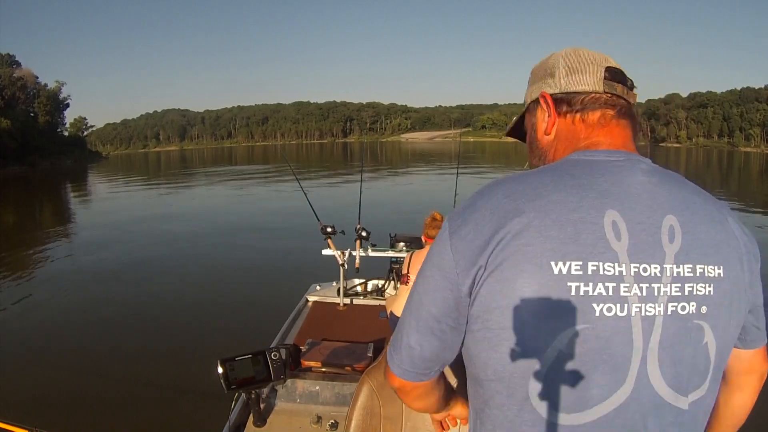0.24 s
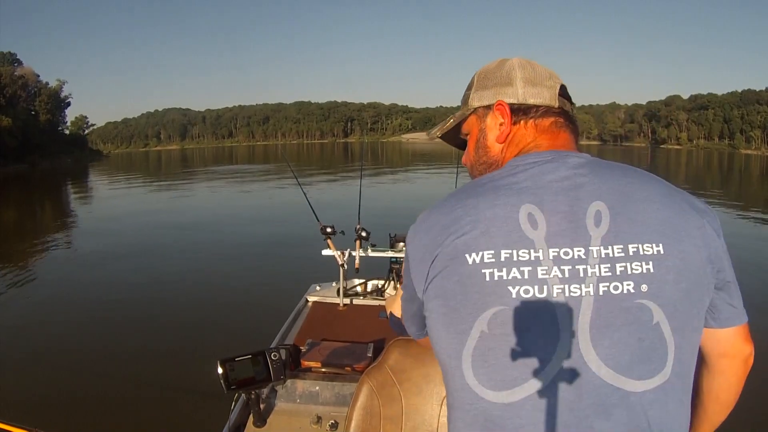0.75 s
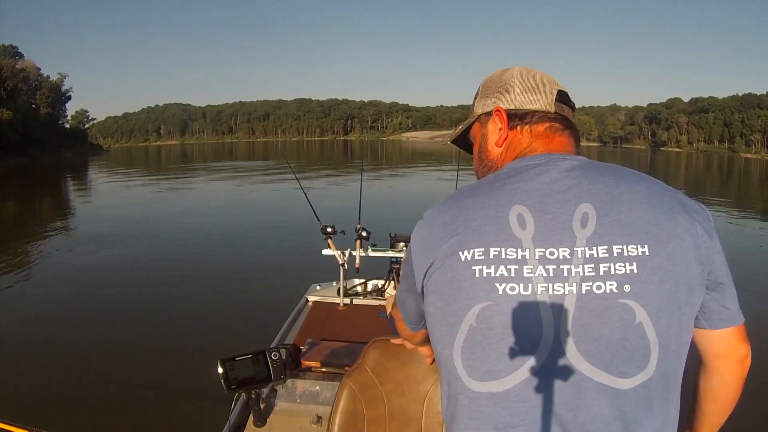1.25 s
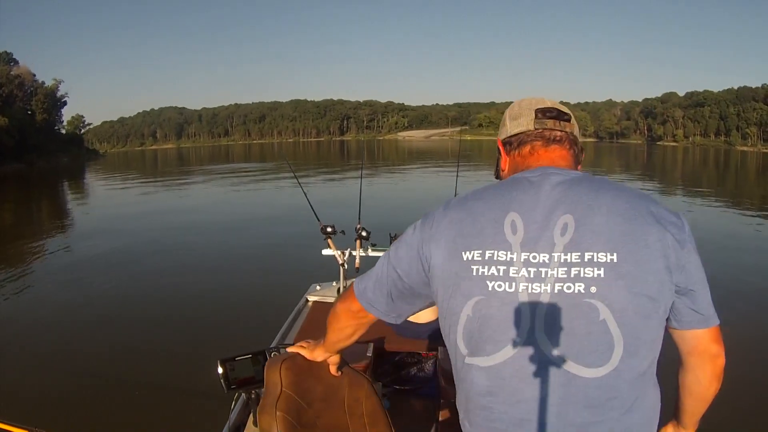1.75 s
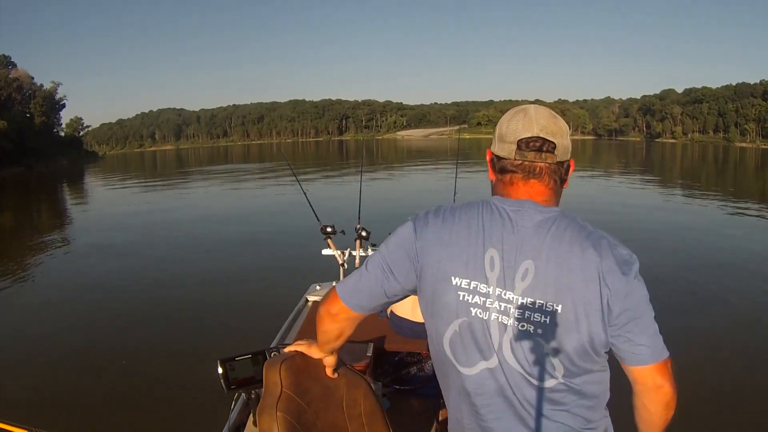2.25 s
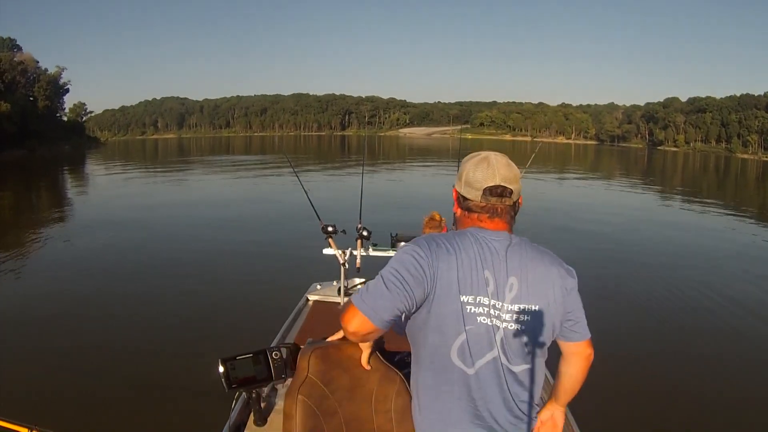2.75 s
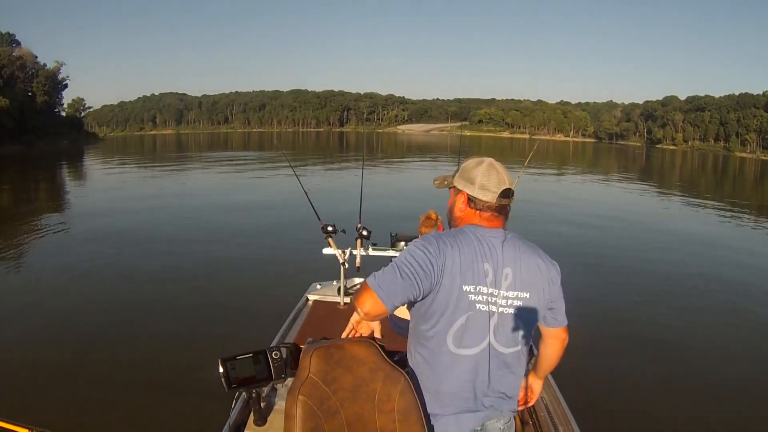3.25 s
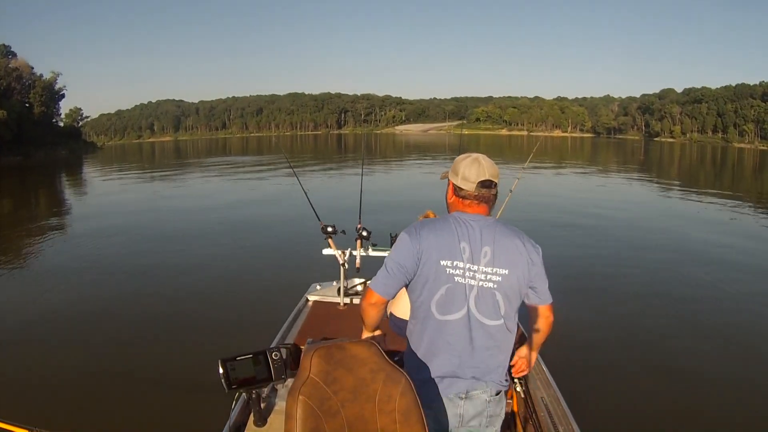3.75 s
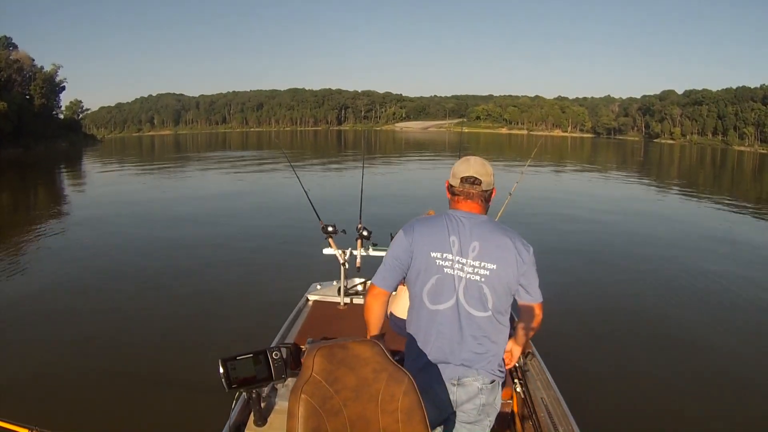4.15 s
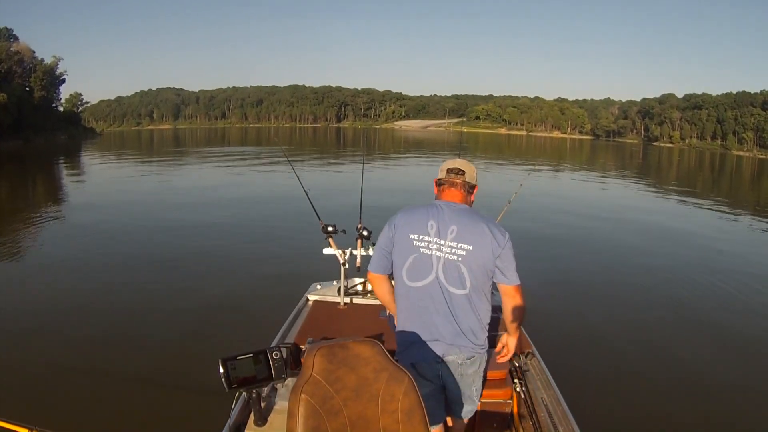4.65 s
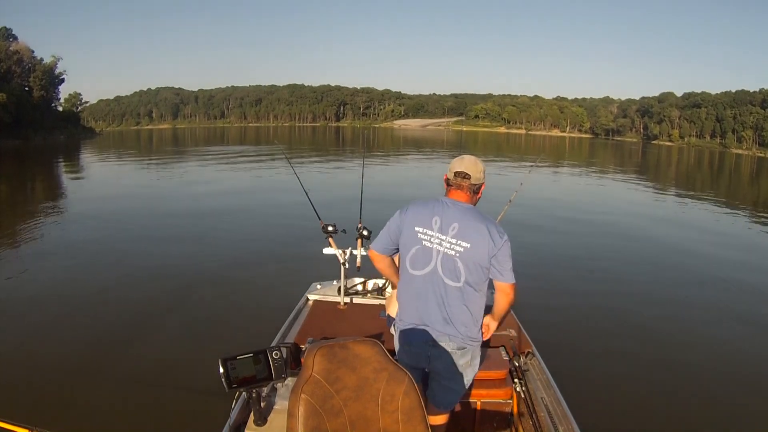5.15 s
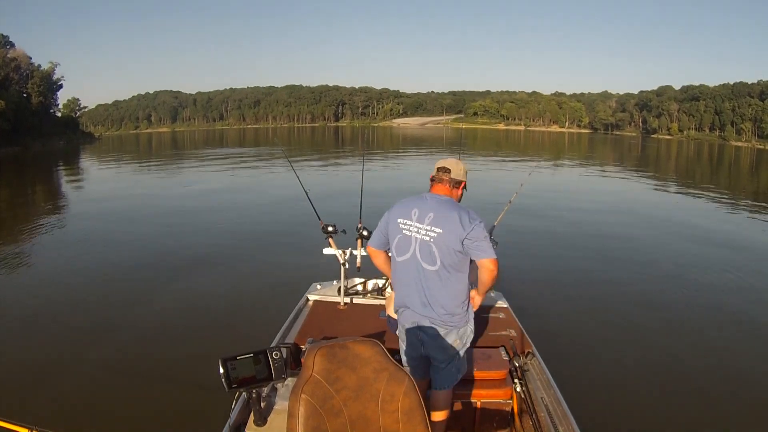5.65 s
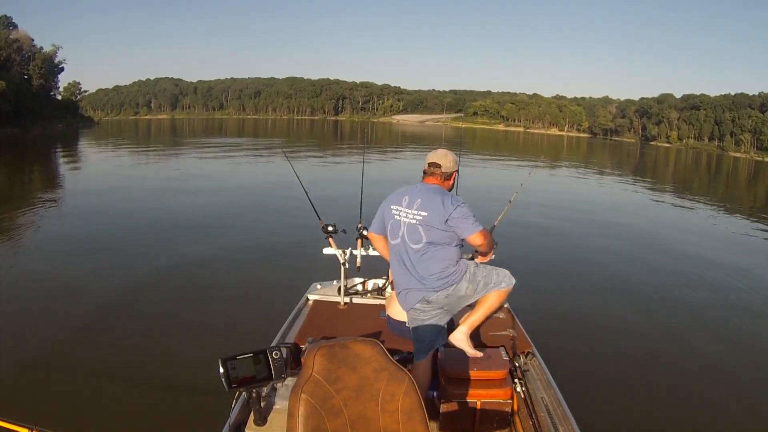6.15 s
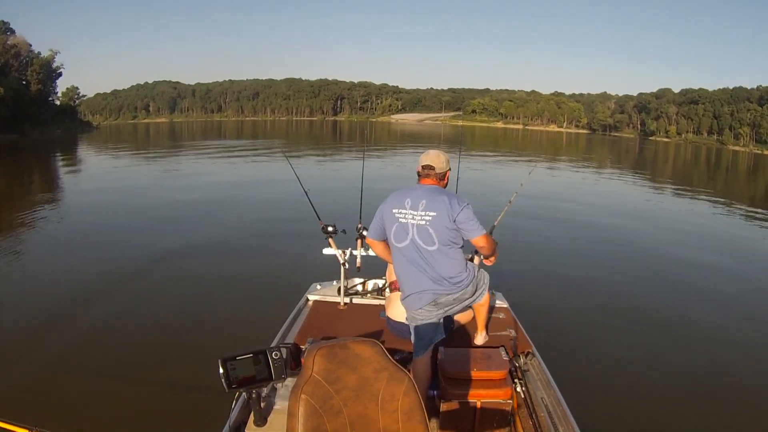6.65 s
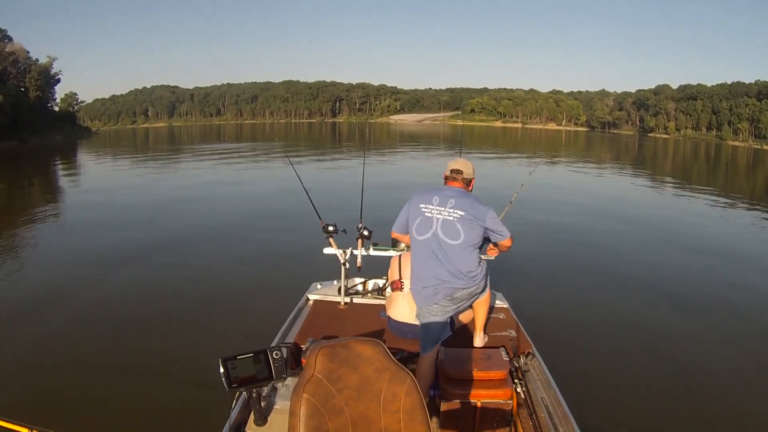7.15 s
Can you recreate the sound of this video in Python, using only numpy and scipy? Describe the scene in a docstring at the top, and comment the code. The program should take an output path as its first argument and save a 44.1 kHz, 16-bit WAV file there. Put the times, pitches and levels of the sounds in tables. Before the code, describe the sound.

Barefoot steps thud irregularly along a small boat's hollow hull, loudest just before three seconds, with light clacks over faint low rumble and hiss.

```python
"""A small fishing boat adrift on a calm lake: a man walks along it, heard from a camera on a pole in the stern.
Each footfall lands heel first, then sole, as ringing hull and deck modes; bumps and nudges use the same modes.
Feet scuff in grainy noise, and loose fittings and tackle clack as short, high rings.
The knocks leave a diffuse tail in the hull, which rumbles and sways in shaped noise as his weight shifts.
Behind it lie a faint hiss, the camera's ticking electronics and three tiny, high chirps."""
import sys
import numpy as np
from scipy import signal
from scipy.fft import rfft, irfft
from scipy.io import wavfile
from scipy.ndimage import uniform_filter1d

SR = 44100
rng = np.random.default_rng(int(sys.argv[2]) if len(sys.argv) > 2 else 0)


def persist_wave(psi):
    """Save psi, clipped to +-1, as 16-bit WAV."""
    counts = np.round(np.clip(psi, -1, 1) * 32767).astype(np.int16)
    wavfile.write(sys.argv[1], SR, np.atleast_2d(counts).T)


N = 326091

# the weight shifting in the boat, before the gains of drone, sway and nudges: t/s, level/dB
RUMBLE = [(0.0, -53), (0.31, -49), (0.57, -56), (0.95, -56), (1.71, -45), (2.12, -46.5), (2.36, -42),
          (2.72, -44), (4.28, -57), (4.82, -55.5), (5.21, -48.5), (5.54, -55.5), (5.95, -47.5), (6.22, -60),
          (6.59, -49.5), (6.75, -59), (7.39, -53.5)]
# colour of dry rattling and scraping: f/Hz, relative level/dB
RATTLE = [(300, -25), (600, -6), (850, -2.5), (1150, 1.5), (1550, 1.5), (1720, -17.5), (2150, -8.5),
          (2600, -24), (4000, -30.5), (15000, -61)]


def amp(db):
    """Decibels to gain."""
    return 10 ** (np.asarray(db) / 20)


def unit_rms(x):
    """Scales a sound to an rms of one."""
    return x / np.sqrt(np.mean(x ** 2) + 1e-20)


def unit_peak(x):
    """Scales a sound to a peak of one."""
    return x / (abs(x).max() + 1e-20)


def decay(t, t60):
    """Exponential fall by 60 dB in t60 seconds."""
    return np.exp(-np.log(1000) * t / t60)


def add(mix, s, sound):
    """Mixes a sound in at a time in seconds."""
    part = mix[max(round(s * SR), 0):][:len(sound)]
    part += sound[:len(part)]


def noise(colour, size):
    """Noise of unit rms with a spectrum given as (Hz, dB) points."""
    hz, db = np.transpose(colour)
    bins_hz = np.fft.rfftfreq(size, 1 / SR)
    gain = amp(np.interp(np.log(bins_hz + 1), np.log(hz), db))
    return unit_rms(irfft(rfft(rng.standard_normal(size)) * gain, size))


def level(curve):
    """Gain at every sample from (s, dB) points."""
    return amp(np.interp(np.arange(N) / SR, *np.transpose(curve)))


def ring(modes, t, extra_db=0):
    """Dying modes; neighbours start in opposite directions, so the sound swells as the wave travels to the pole."""
    hz, db, t60 = np.transpose(modes)
    height = (-1) ** np.arange(len(hz)) * amp(db + extra_db)
    swings = np.sin(2 * np.pi * np.outer(hz, t))
    return height @ (swings * decay(t, t60[:, None]))


def knock(db, hard_db, plates_db, spot, soft_hz=146, steepness=14,
          contact_s=0.002377, travel_s=0.003921, swell_s=0.00785):
    """A soft blow moves mostly the lowest hull modes, a hard one the upper too; the plates have their own level."""
    # modes of the hull, before the spot factor: f/Hz, relative level/dB, t60/s
    hull_modes = [(58, -34, 0.19), (94.1, 0.5, 0.18), (122.42, 4.5, 0.173), (167.1, 2.5, 0.2077),
                  (189.9, 1.5, 0.1583), (243.4, -6, 0.066)]
    # modes of the deck plates: f/Hz, relative level/dB, t60/s
    plate_modes = [(284, 0, .13), (342, -11, .12), (417, -9, .15), (485, -18, .1), (550, -21, .09),
                   (614, -16, .16), (680, -18, .1), (800, -21, .08), (930, -22, .07), (1088, -23, .11),
                   (1217, -23, .11)]
    t = np.arange(SR // 3) / SR
    # hardness acts on the modes above soft_hz
    upper = 1 / (1 + (soft_hz / np.transpose(hull_modes)[0]) ** steepness)
    push = np.sin(np.pi * np.minimum(t[:SR // 100] / contact_s, 1)) ** 2
    boom = ring(hull_modes, t * spot, hard_db * upper)
    out = unit_peak(signal.oaconvolve(boom, push))
    # each knock favours other plate modes at random, and their ring builds up as it spreads over the deck
    favour_db = 2 * rng.standard_normal(len(plate_modes))
    plates = ring(plate_modes, t, favour_db) * (1 - np.exp(-t / swell_s))
    add(out, travel_s, amp(plates_db) * unit_peak(plates))
    return amp(db) * out


def footsteps(sole_softer_db=9, sole_plates_db=-3,
              rebound_s=.058, rebound_loss_db=14, rebound_plates_db=-30, rebounds=2):
    """The heel strikes, the foot rolls onto its softer sole, and the deck rebounds ever more weakly."""
    # footfalls: t/s, heel's hull peak/dB, hardness on the upper hull modes/dB, deck plates against the boom/dB,
    # factor on the hull modes for the spot struck, roll to the sole/s, sole against the heel/dB
    footfalls = [ (0.045, -30, -12, -19.5, 1.035, 0.0224, 5), (1.49, -13, -0.5, -20, 0.991, 0.01295, -0.5),
                 (1.912, -30, -20, -24.5, 1.172, 0.02405, -1), (2.203, -16.5, -1, -24.5, 1.07, 0.0237, -4),
                 (2.436, -22, -24, -30.5, 0.916, .026, -9.5),
                 (2.572, -29.5, -4.5, -25.5, 0.9345, .024, 15.5), (2.778, -8, 8, -20, 0.948, 0.01813, -18),
                 (3.398, -35, -15, -23, 0.944, 0.0247, 12.5),
                 (4.846, -28.5, -21.5, -15.5, 1.089, 0.01623, -7),
                 (5.124, -24, -4.5, -10, 1.01, 0.0255, -4), (5.320, -34, 3, -13.5, 0.951, 0.02034, 0),
                 (6.361, -27.5, -14, -23.5, 0.951, .035, -10.5)]
    out = np.zeros(N)
    for s, db, hard_db, plates_db, spot, roll_s, sole_db in footfalls:
        heel = knock(db, hard_db, plates_db, spot)
        add(out, s, heel)
        sole = knock(db + sole_db, hard_db - sole_softer_db, plates_db + sole_plates_db, spot)
        add(out, s + roll_s, sole)
        for k in range(1, rebounds + 1):
            rebound = knock(db - k * rebound_loss_db, hard_db, rebound_plates_db, spot)
            add(out, s + k * rebound_s, rebound)
    return out


def bumps(plates_db=-22.5):
    """A foot, knee or hand strikes the hull once, between the footfalls."""
    # bumps: t/s, hull peak/dB, hardness on the upper hull modes/dB, factor on the hull modes for the spot struck
    strikes = [ (0.236, -31, -14, 0.965), (0.306, -38.5, -20.5, 0.914), (0.45, -36, -8.5, 0.976),
               (1.125, -38, -19.5, 1.062), (1.448, -23.5, -9, 0.858), (1.6, -33.5, 10, 0.929),
               (1.718, -36, -0.5, 1.008), (1.87, -25, -20.5, 0.978), (2.394, -25.5, -19, 0.89),
               (2.971, -26, -10.5, 0.924), (3.113, -28, -18, .96), (3.198, -33.5, -17.5, .87),
               (3.746, -37.5, -25.5, 0.8), (3.816, -34.5, -20.5, 0.915), (4.406, -38, -19, 0.988),
               (5.018, -28, -8, 0.866), (5.727, -33.5, -9.5, .96), (5.961, -32, -25, 1.034),
               (6.1, -35, -12, 0.903), (6.47, -33.5, -34, 1.164), (6.927, -29.5, -7, 1.04),
               (7.189, -29, -16, 0.894), (7.348, -35, -3.5, 0.948)]
    out = np.zeros(N)
    for s, db, hard_db, spot in strikes:
        add(out, s, knock(db, hard_db, plates_db, spot))
    return out


def nudges(per_s=4, against_rumble_db=7.5, spread_db=1, hard_db=-14, plates_db=-20, spot_spread=0.074):
    """Keeping his balance, the man nudges the deck at random, harder while his weight is on the move."""
    out = np.zeros(N)
    for slot in np.arange(0, N / SR, 1 / per_s):
        s = slot + rng.random() / per_s
        strength, spot = rng.standard_normal(2)
        db = np.interp(s, *np.transpose(RUMBLE)) + against_rumble_db + spread_db * strength
        add(out, s, knock(db, hard_db, plates_db, 1 + spot_spread * spot))
    return out


def scuffs(peak_at=0.293, grain=0.304):
    """A foot slides briefly: a grainy scrape that swells quickly and fades."""
    # feet on the deck: t/s, length/s, rms level at the height of the stroke/dB
    slides = [(0.01, .12, -62), (0.258, 0.03, -62.5), (1.444, 0.0366, -60), (1.866, 0.051, -53.5),
              (2.794, 0.0514, -47), (7.079, 0.094, -67), (7.375, 0.031, -58.5)]
    out = np.zeros(N)
    for s, length_s, db in slides:
        size = round(length_s * SR)
        stroke = np.interp(np.linspace(0, 1, size), [0, peak_at, 1], [0, 1, 0])
        roughness = unit_rms(uniform_filter1d(rng.standard_normal(SR // 4), size=90))
        catches = unit_rms(np.exp(grain * roughness))
        scrape = catches * noise(RATTLE, SR // 4)
        add(out, s, amp(db) * stroke * scrape[:size])
    return out


def fittings(rise_s=0.00185, rattle_t60=0.0857):
    """Each clack of a loose fitting blends a short modal ring with a dry rattle of noise."""
    # clacks: t/s, peak level/dB, share of loose rattle (0-1), factor on the modes
    clacks = [ (0.019, -46, 0.56, 1.09), (0.048, -44.5, 0.44, 1.124), (0.1066, -49, 0.81, 0.81),
              (0.261, -53.5, 0.64, 1.05), (1.495, -39.5, 0.43, .96), (1.608, -49, 0.43, .98),
              (2.208, -39, 0.1, 1.01), (2.784, -31.5, 0.48, 1.07), (3.816, -47.5, 0, 1.043),
              (4.843, -34.5, 0.21, 1.008), (5.124, -44, 0.36, .97), (5.321, -48, 0.5, 0.99),
              (5.391, -50, 0.06, 0.965), (6.655, -56, 0.66, 1), (6.928, -56, 0.68, .95),
              (7.028, -57, 0.51, 1.05), (7.346, -48, 0.34, 1)]
    # modes of the fittings, before that factor: f/Hz, relative level/dB, t60/s
    fitting_modes = [(1215, -5.5, 0.0418), (1390, 4.5, 0.025), (1485.2, -1.5, 0.034), (1530, -27, 0.025)]
    out, t = np.zeros(N), np.arange(SR // 6) / SR
    for s, db, loose, tuning in clacks:
        rattle = unit_peak(noise(RATTLE, len(t)) * decay(t, rattle_t60))
        tone = unit_peak(ring(fitting_modes, t * tuning))
        clack = (1 - loose) * tone + loose * rattle
        add(out, s, amp(db) * unit_peak(clack * (1 - np.exp(-t / rise_s))))
    return out


def tackle(length_s=0.025, count=8):
    """A jolt sets light tackle ticking in a quick cluster of small rings."""
    # jolts: t/s, peak level of the cluster/dB
    jiggles = [(0.018, -53.5), (0.045, -54), (0.261, -56.5), (2.802, -52), (5.735, -57.5), (7.115, -61.5),
               (7.355, -59.5)]
    # modes of the tackle: f/Hz, relative level/dB, t60/s
    tackle_modes = [(2125, 4.5, 0.0204), (2225.5, 0, 0.0255), (2382, -1, 0.0167)]
    out, t = np.zeros(N), np.arange(SR // 12) / SR
    for s, db in jiggles:
        cluster = np.zeros(SR // 6)
        for k, (late, size) in enumerate(rng.random((count, 2))):
            add(cluster, length_s * (k + late) / count, (.5 + size) * ring(tackle_modes, t))
        add(out, s, amp(db) * unit_peak(cluster))
    return out


def scatter(x, low_t60=1.0, high_t60=0.14, split_hz=230, build_s=0.039):
    """Waves run to and fro in the hull: a diffuse tail in which the bass lasts longest."""
    t = np.arange(SR * 2 // 3) / SR
    paths = rng.standard_normal(len(t)) * (1 - np.exp(-t / build_s))
    low = signal.sosfiltfilt(signal.butter(3, split_hz, fs=SR, output="sos"), paths)
    tail = 0
    for band, t60 in (low, low_t60), (paths - low, high_t60):
        fall = decay(t, t60)
        tail = tail + band * fall / np.linalg.norm(fall)
    return signal.oaconvolve(x, tail)[:N]


def rocking(drone_db=1.35, sway_db=-6.5, sway_lag_s=0.11):
    """The hull drones as the weight in it shifts; the whole boat flexes a moment later, deeper down."""
    # colour of the drone: f/Hz, relative level/dB
    drone_colour = [(30, -30), (60, -4), (90, -1.5), (110, -1.5), (130, 4), (150, -19), (175, -9),
                    (230, -26.5), (400, -39), (900, -73)]
    # colour of the flexing: f/Hz, relative level/dB
    sway_colour = [(10, -17.5), (22, -8.5), (32, -2.5), (42, -3.5), (56, -7), (75, -13), (200, -62),
                   (600, -91)]
    drone = amp(drone_db) * level(RUMBLE) * noise(drone_colour, N)
    flexing = level([(s + sway_lag_s, db + sway_db) for s, db in RUMBLE])
    return drone + flexing * noise(sway_colour, N)


def hiss(rms_db=-61):
    """A faint, steady hiss: shaped noise at one level throughout."""
    # colour of the hiss: f/Hz, relative level/dB
    hiss_colour = [(20, -17), (150, -2), (300, -1.5), (600, -5.5), (1200, -9), (2400, -13.5), (4800, -18.5),
                   (7500, -23), (8400, -23), (9500, -27), (11200, -26), (13000, -30.5), (15000, -36.5)]
    return amp(rms_db) * noise(hiss_colour, N)


def electronics(tick_db=-73.0, burst_db=-78, jitter_s=0.0027, tick_s=0.0103, burst_s=0.087, spread_db=1):
    """In spells, the camera's circuits tick ten times a second, faint and high, and buzz longer twice a second."""
    # colour of the buzz: f/Hz, relative level/dB
    buzz_colour = [(2000, -40), (7700, -20), (8100, -3), (8400, 2), (8800, -8), (10200, -11), (11000, -3),
                   (12000, -4), (13000, -13), (15000, -30)]
    # spells of ticking: from t/s, to t/s
    spells = [(0.148, 2.9), (4.356, 7.1)]
    # longer bursts: time into each second/s
    burst_at = [0.2734, .74]
    gate = np.zeros(N)
    tick = signal.windows.tukey(round(tick_s * SR), .5)
    burst = signal.windows.tukey(round(burst_s * SR), .5)
    burst_times = np.add.outer(np.arange(N // SR + 1), burst_at).ravel()
    for start, end in spells:
        for s, (late, strength) in zip(np.arange(start, end, 1 / 10), rng.standard_normal((40, 2))):
            add(gate, s + jitter_s * late, amp(tick_db + spread_db * strength) * tick)
        for s in burst_times[(burst_times > start) & (burst_times < end)]:
            add(gate, s, amp(burst_db) * burst)
    return gate * noise(buzz_colour, N)


def chirps(length_s=0.0457, waver_hz=110):
    """Thin, wavering sine notes, as of a small bird far off on the shore."""
    # notes: t/s, peak level/dB, f before the waver/Hz
    notes = [(2.951, -70, 6720), (3.597, -70, 6770), (7.294, -70, 6700)]
    out, size = np.zeros(N), round(length_s * SR)
    for s, db, hz in notes:
        waver = unit_rms(uniform_filter1d(rng.standard_normal(size), size=60))
        phase = 2 * np.pi * np.cumsum(hz + waver_hz * waver) / SR
        add(out, s, amp(db) * signal.windows.tukey(size, .5) * np.sin(phase))
    return out


def scene(tail_db=-17):
    """Knocks, scuffs and clacks with their tail in the hull, over rumble, hiss, electronics and chirps."""
    knocks = footsteps() + bumps() + nudges() + scuffs() + fittings() + tackle()
    background = rocking() + hiss() + electronics() + chirps()
    return (knocks + amp(tail_db) * scatter(knocks) + background)[None]


def record(dry, edge_hz=15300):
    """The camera's band limit: a steep low-pass."""
    band_limit = signal.firwin(401, edge_hz, window=("kaiser", 8), fs=SR)
    return signal.oaconvolve(dry, band_limit[None], "same")


dry = scene()
out = record(dry)
persist_wave(out)
```